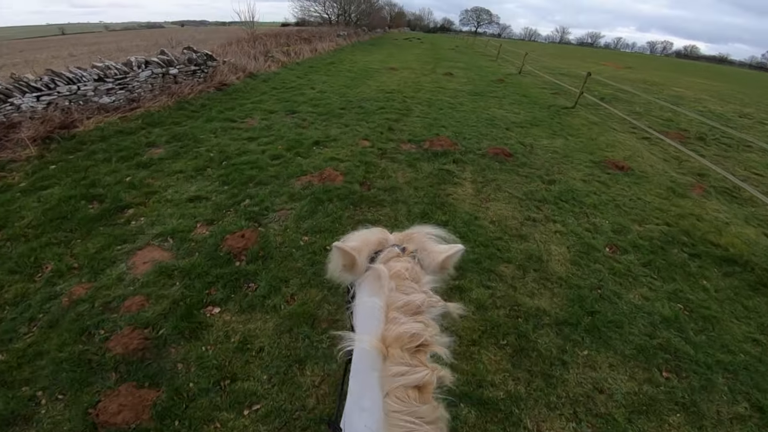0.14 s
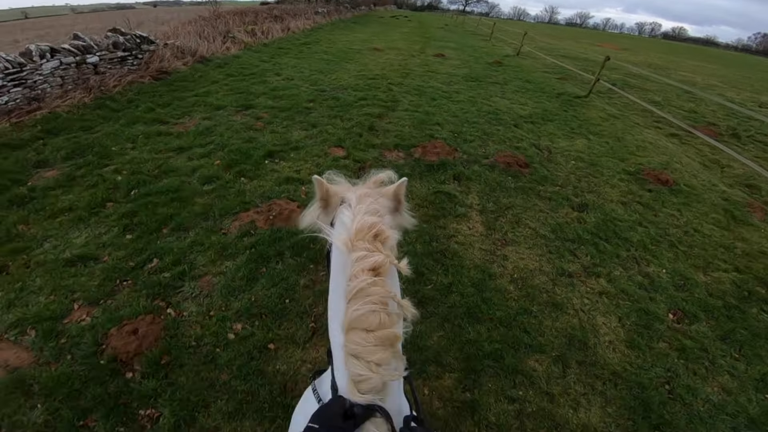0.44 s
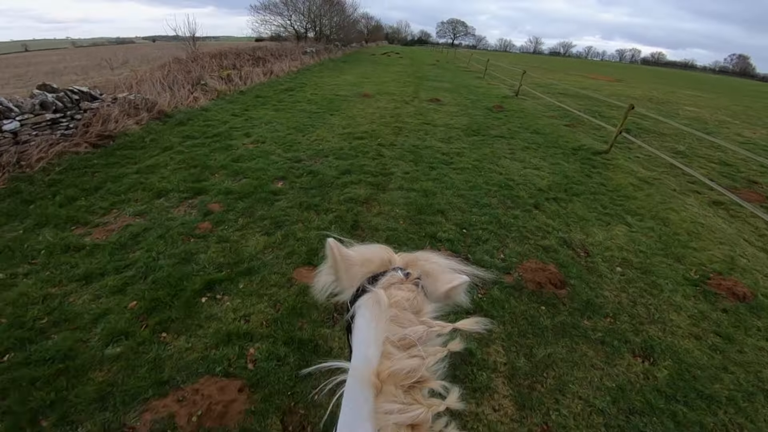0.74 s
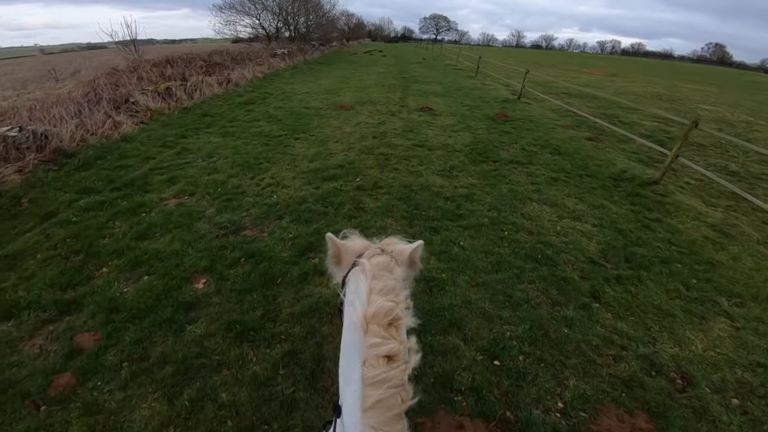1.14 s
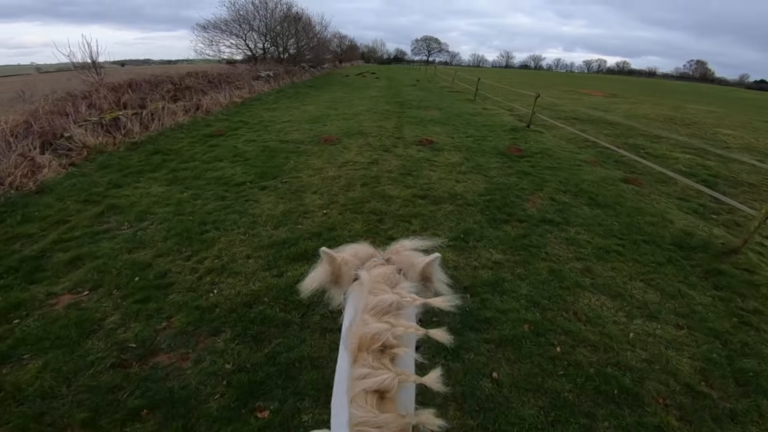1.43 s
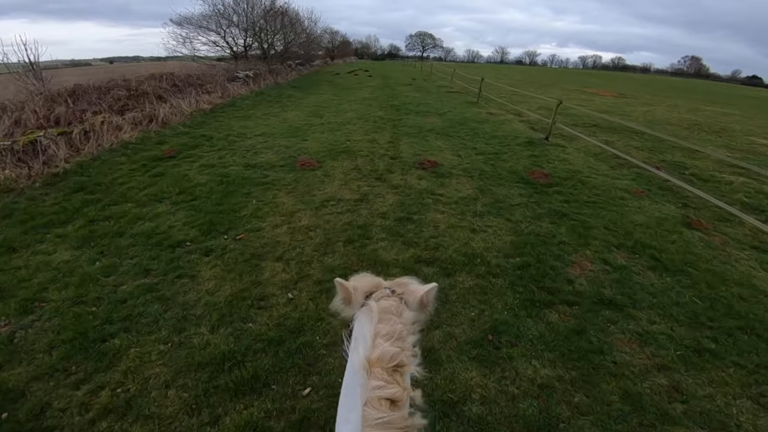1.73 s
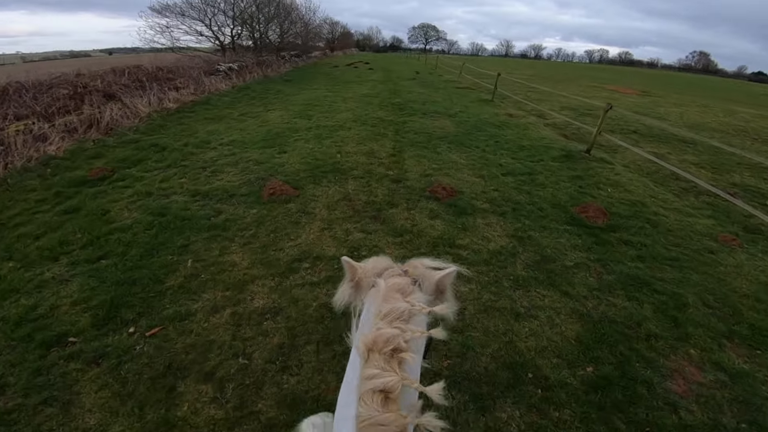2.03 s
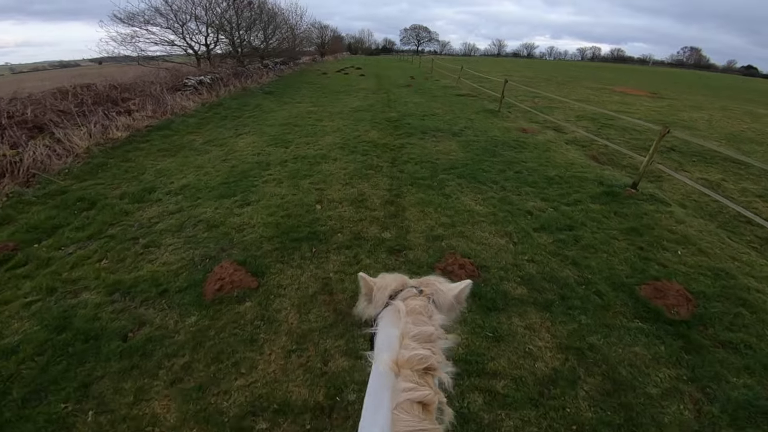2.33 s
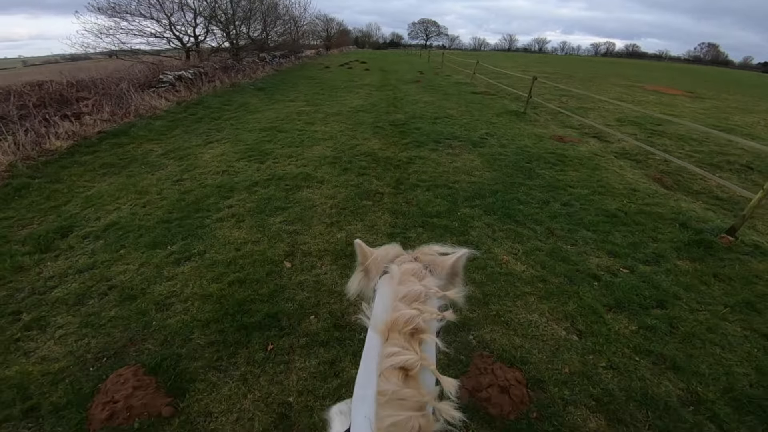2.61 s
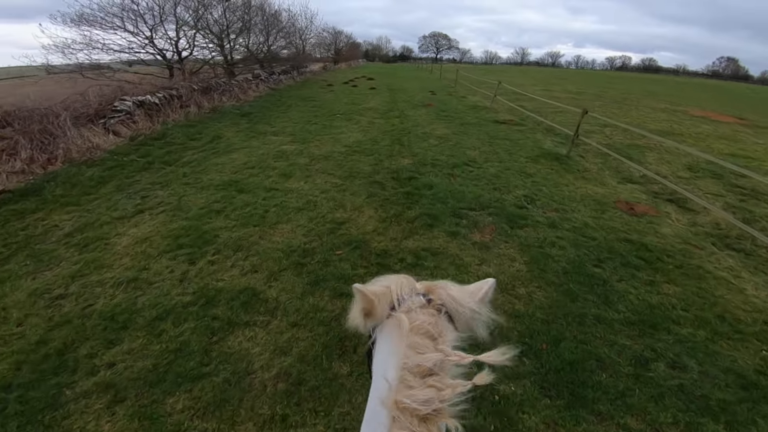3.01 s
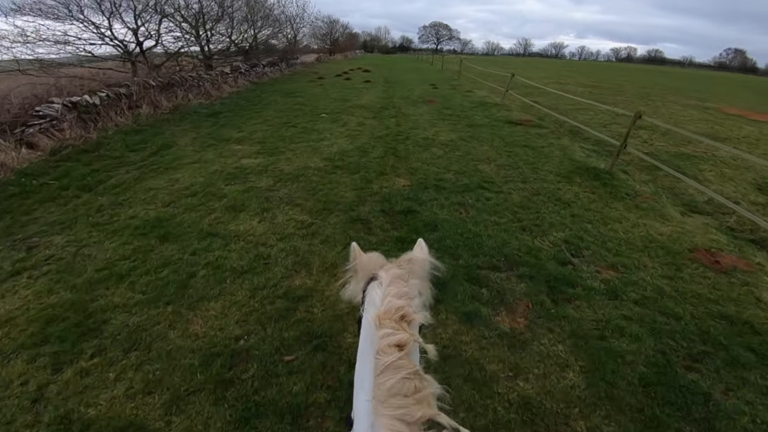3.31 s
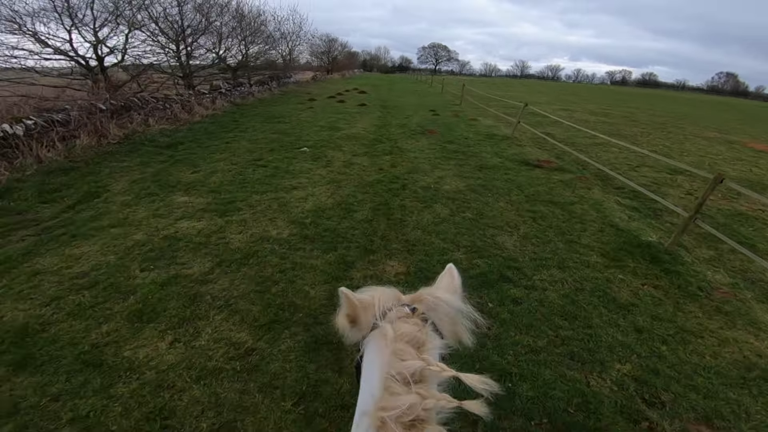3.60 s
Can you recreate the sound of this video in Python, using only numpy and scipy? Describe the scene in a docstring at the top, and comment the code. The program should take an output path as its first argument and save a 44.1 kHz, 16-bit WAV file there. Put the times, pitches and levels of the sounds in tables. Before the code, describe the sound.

Cantering hooves thud dully through wet turf while gusty wind buffets and pops the rider's microphone.

```python
"""Open wet grass, with a pony cantering over it, heard from a camera on the rider's head.
Wind on the microphone is a deep noise rumble under surging gusts, their bright edge gritty with eddies;
short flaps of turbulence and sharp, pulse-like pops break out of it.
Below, each hoof swishes through the grass as patchy noise and lands with a soft thud of decaying sines.
A faint, steady hiss of air and grass lies behind it all."""
import sys
import numpy as np
from scipy import signal
from scipy.fft import rfft, irfft
from scipy.io import wavfile
from scipy.ndimage import uniform_filter1d, map_coordinates

SR = 44100
rng = np.random.default_rng(int(sys.argv[2]) if len(sys.argv) > 2 else 0)


def transcribe(signal):
    """Save signal, clipped to [-1, 1], as a 16-bit WAV file at the path in sys.argv[1]."""
    frames = np.atleast_2d(signal).T
    limited = np.clip(frames, -1, 1)
    pcm = np.round(limited * 32767).astype(np.int16)
    wavfile.write(sys.argv[1], SR, pcm)


def undo_db(level):
    """Turn decibels back into plain size, where 20 dB means ten times bigger."""
    steps = np.asarray(level, float) / 20
    return 10 ** steps


N = 165375  # length in samples

# In every colour below, level/dB is relative: the layer sets its own loudness afterwards.
# Colour of the steady rush of air and grass: f/Hz, level/dB
HISS_COLOUR = [(1290, -45.5), (2200, -20), (3140, -13.5), (3990, -4), (4530, -6), (6510, -14),
               (6900, -27.5), (7160, -38), (7840, -44), (10200, -81.5), (17200, -120)]
# Course of the wind: t/s, gust level/dB before trim, bright edge level/dB over the gust before trim,
# rumble level/dB before tilt, rumble tilt/dB (positive favours its upper part)
WIND_COURSE = [(0.0, -52.5, -4, -39, 11.5), (0.05, -39, -22, -27.5, -3), (0.11, -38, -10, -28.5, 0),
               (0.19, -32.5, -17.5, -29.5, 0.5), (0.27, -41, -18.5, -29, 4), (0.34, -36.5, -18.5, -27.5, 2),
               (0.38, -48, -5, -36.5, 1), (0.408, -42.5, -30, -25, 0.5), (0.43, -62.5, 2, -39.5, 0),
               (0.47, -50.5, -12, -29, 1), (0.551, -46.5, -16, -28, -0.5), (0.581, -32, -19.5, -33.5, 0),
               (0.59, -52, -10, -28.5, 2), (0.62, -52, -12, -30.5, 3.5), (0.655, -45.5, -12, -22, -2),
               (0.675, -41.5, -16, -31.5, 7.5), (0.69, -39.5, -8, -22, -7.5),
               (0.712, -34.5, -9.5, -27, -3.5), (0.73, -34.5, -23, -30, -1),
               (0.761, -28, -25.5, -25.5, -3.5), (0.802, -33, -12, -24, 0), (0.821, -40.5, -20, -32, 4),
               (0.869, -46.5, -21, -33, -2), (0.88, -42.5, -16, -33.5, 1), (0.94, -40.5, -17, -29, -2.5),
               (1.049, -49.5, -18, -30, -1.5), (1.17, -32.5, -26.5, -28, 3),
               (1.19, -33.5, -15, -30.5, -1.5), (1.203, -30, -23, -25, -4),
               (1.211, -32.5, -12.5, -24.5, 0.5), (1.232, -31, -9.5, -28.5, -1),
               (1.25, -31, -17.5, -28.5, -6.5), (1.35, -40, -8.5, -28.5, -1), (1.42, -45.5, -10, -30.5, -2),
               (1.501, -42, -23, -35, 0.5), (1.509, -29.5, -35, -26.5, -6), (1.53, -32, -19.5, -34, 0),
               (1.56, -35.5, -44, -33, 9), (1.58, -38.5, -23.5, -31.5, 0.5), (1.689, -30, -18.5, -33, 5),
               (1.738, -30, -17.5, -28.5, -5), (1.784, -26.5, -19.5, -31, -4),
               (1.819, -38.5, -12, -36.5, 13.5), (1.89, -36, -14, -33, -1), (1.99, -39.5, -13, -31.5, 1.5),
               (2.09, -45.5, -18.5, -34, 0), (2.12, -43.5, -39, -37, 11.5), (2.251, -31, -22, -30.5, 5.5),
               (2.273, -29.5, -18, -30, 4.5), (2.285, -26.5, -20, -35, 0), (2.299, -30.5, -14.5, -30.5, 3),
               (2.37, -30.5, -19.5, -30.5, 4.5), (2.42, -40, -8, -35, -3.5), (2.58, -36, -21.5, -30.5, 2),
               (2.622, -46, -20, -37.5, -2.5), (2.651, -30, -19.5, -24.5, -1.5), (2.69, -39, -28, -33, 5),
               (2.75, -36.5, -26, -28.5, 3), (2.901, -36, -20.5, -29, 3), (2.94, -29, -18, -30, 4),
               (3.04, -33, -15.5, -25.5, -2), (3.056, -45, -11, -36, 8), (3.08, -39, -8.5, -31.5, 0),
               (3.14, -41.5, -24, -33, -4.5), (3.24, -41.5, -35, -29.5, 3.5), (3.33, -36, -42, -26, -4.5),
               (3.361, -32.5, -17, -27, 10), (3.42, -32, -15, -26.5, 3), (3.48, -32.5, -12, -28.5, 0),
               (3.509, -32.5, -11, -15, -3.5), (3.53, -36.5, -14, -20.5, -5),
               (3.59, -38.5, -6.5, -25.5, -2), (3.62, -43, -11, -27, -1.5), (3.74, -35, -25, -32, 1),
               (3.75, -33, -16, -30.5, -6)]
# Colour of the low wind rumble before tilt: f/Hz, level/dB
RUMBLE_COLOUR = [(11, -42), (18, -2), (48, -4), (85, 3), (145, -1.5), (233, -7.5), (417, -19.5),
                 (454, -25.5), (500, -32), (650, -60.5), (1100, -120)]
# Colour of the body of the gusts: f/Hz, level/dB
GUST_COLOUR = [(82, -30), (140, -1), (236, -3.5), (333, -3.5), (529, -9), (571, -8), (1400, -27.5),
               (1820, -51), (3080, -120)]
# Colour of the bright edge of the gusts: f/Hz, level/dB
EDGE_COLOUR = [(500, -5), (900, -1), (1200, -6.5), (1700, -6.5), (2300, -17.5), (3100, -27), (4200, -25.5),
               (5300, -38), (6500, -47), (7600, -71.5)]
# Short flaps of air on the microphone port: t/s, level/dB before trim and envelope
FLAP_EVENTS = [(0.303, -21), (0.326, -30), (0.578, -44), (0.627, -27.5), (0.651, -26.5), (0.695, -29),
               (0.889, -29.5), (0.944, -26), (1.133, -28), (1.157, -18), (1.215, -30), (1.229, -18.5),
               (1.262, -16), (1.322, -18.5), (1.404, -34), (1.484, -23.5), (1.512, -34), (1.593, -25),
               (1.753, -11), (1.903, -23), (2.003, -24.5), (2.271, -23), (2.466, -33), (2.52, -19),
               (2.626, -23.5), (2.645, -32), (2.727, -34), (2.787, -47), (2.852, -42), (2.907, -28),
               (3.223, -24.5), (3.315, -24.5), (3.356, -30), (3.388, -22), (3.449, -29), (3.533, -20.5),
               (3.591, -18), (3.638, -20)]
# Colour of a flap: f/Hz, level/dB
FLAP_COLOUR = [(200, -22), (400, 2.5), (900, -2.5), (1700, -18), (2600, -32.5), (4200, -47), (6500, -58),
               (7600, -90)]
# Strongest jolts of the wind: t/s, peak level/dB before trim
POP_EVENTS = [(0.0947, -43), (0.182, -45), (0.21, -35.5), (0.7015, -36), (0.711, -38), (0.7725, -35.5),
              (0.794, -46), (0.8005, -43), (1.208, -24.5), (1.2935, -29), (1.3294, -41), (1.724, -33),
              (1.739, -43), (1.758, -35), (1.7815, -32), (1.818, -43), (2.2751, -35.5), (2.2908, -41),
              (2.325, -56), (2.943, -36), (2.961, -35.5), (2.971, -44), (2.978, -35), (3.017, -42),
              (3.031, -32), (3.037, -33), (3.048, -44), (3.3905, -36), (3.426, -40), (3.4535, -42),
              (3.486, -35.5), (3.491, -33), (3.5085, -30), (3.512, -26.5), (3.5321, -32), (3.5593, -33)]
# Colour of a pop: f/Hz, level/dB
POP_COLOUR = [(200, -19), (600, 11.5), (1800, 1), (3000, -14), (4500, -18.5), (5500, -33.5), (6500, -57.5),
              (8000, -100)]
# Hooves in the grass: t/s, swish level/dB before trim and envelope, swish fade time/s,
# thud level/dB over the untrimmed swish
HOOF_EVENTS = [(0.0224, -47, 0.02, 25), (0.273, -48.5, 0.039, 7.5), (0.362, -43.5, 0.026, 8),
               (0.4414, -38, 0.0083, 14), (0.474, -49, 0.041, 22), (0.544, -52.5, 0.029, 24),
               (0.835, -53, 0.065, 8), (0.93, -47, 0.036, 30.5), (1.0166, -40.5, 0.013, 19.5),
               (1.061, -45.5, 0.031, 11), (1.123, -49, 0.029, 23), (1.409, -55, 0.059, 17),
               (1.465, -56.5, 0.081, 8), (1.577, -46, 0.022, 7), (1.98, -54.5, 0.041, 31),
               (2.088, -47.5, 0.013, 26), (2.149, -49.5, 0.038, 6), (2.4, -44, 0.012, 19),
               (2.5416, -52.5, 0.037, 15), (2.6425, -42.5, 0.015, 16), (2.7033, -50, 0.033, 30.5),
               (3.093, -53, 0.058, 28), (3.139, -57.5, 0.092, 16), (3.215, -46, 0.013, 19),
               (3.282, -45, 0.023, 25.5), (3.653, -52.5, 0.064, 9)]
# Colour of the wet blades: f/Hz, level/dB
GRASS_COLOUR = [(900, -50), (1500, 7.5), (2200, 3.5), (3100, -8), (4200, 2), (5500, -2.5), (6600, -9),
                (7600, -23.5), (8500, -77)]
# Modes of the soft turf, before each hoof's scatter: f/Hz, level/dB, time to fall by 60 dB/s
TURF_MODES = [(107, 5.5, 0.035), (249, 1.5, 0.022), (480, -15.5, 0.09)]


def unit(x):
    """x at rms 1."""
    return x / np.sqrt(np.mean(x ** 2) + 1e-20)


def gains(points, size):
    """Gain of (f/Hz, level/dB) points on an FFT grid, joined by lines over log frequency."""
    hz, db = np.transpose(points)
    grid_hz = np.fft.rfftfreq(size, 1 / SR)
    return undo_db(np.interp(np.log(grid_hz + 1), np.log(hz + 1), db, left=-100, right=-120))


def coloured(x, points):
    """x through a causal minimum-phase filter with the given spectrum."""
    size = 8192
    # folding the cepstrum forward in time makes the phase minimal
    cepstrum = irfft(np.log(gains(points, size)))
    cepstrum[1:size // 2] *= 2
    cepstrum[size // 2 + 1:] = 0
    response = irfft(np.exp(rfft(cepstrum)))
    return signal.fftconvolve(x, response)[:N]


def wobble(rate):
    """A smooth random curve with rate knots a second."""
    knots = rng.standard_normal(int(N * rate / SR) + 4)
    return map_coordinates(knots, [np.arange(N) * rate / SR])


def grains(per_s, spread_db):
    """Random impulses of either sign, mostly small, a few large; rms 1."""
    present = rng.random(N) < per_s / SR
    size = np.minimum(rng.exponential(size=N), 3)
    sign = rng.choice([-1, 1], N)
    return unit(present * sign * undo_db(spread_db * size))


def puffs(x, life_s):
    """Each impulse of x becomes a short, decaying burst of noise; rms 1."""
    decay = np.exp(-np.arange(SR // 50) / SR / life_s)
    power = signal.fftconvolve(x ** 2, decay)[:N]
    return unit(np.sqrt(np.abs(power)) * rng.standard_normal(N))


def patchy(x):
    """Random patches of gain over time and pitch, as in uneven air or grass; rms 1."""
    depth_db = 1.6
    z = signal.stft(x, nperseg=256)[2]
    field = rng.standard_normal(z.shape)
    field = uniform_filter1d(field, size=5, axis=0)  # across pitch
    field = uniform_filter1d(field, size=7, axis=1)  # across time
    return unit(signal.istft(z * undo_db(depth_db * unit(field)), nperseg=256)[1][:N])


def impulses(rows, points):
    """One short pulse of the given colour and peak level, of either sign, for each (t/s, level/dB) row."""
    s, db = np.transpose(rows)
    sign = rng.choice([-1, 1], len(s))
    clicks = np.bincount(np.round(s * SR).astype(int), undo_db(db) * sign, N)
    single_click = np.eye(1, N)[0]
    return coloured(clicks, points) / np.abs(coloured(single_click, points)).max()


def hiss():
    """A steady noise rush of air and grass that wavers a little."""
    level_db = -73.5 + 1.8 * wobble(8.4)
    return undo_db(level_db) * unit(coloured(rng.standard_normal(N), HISS_COLOUR))


def wind_curves():
    """Gust, edge, rumble and tilt in dB, gliding between the points of the wind's course."""
    s, *columns = np.transpose(WIND_COURSE)
    return [np.interp(np.arange(N) / SR, s, column) for column in columns]


def rumble(rumble_db, tilt_db):
    """Low, uneven wind noise that leans to either side of a pivot pitch."""
    lumps_db, pivot_hz = 2.5, 95
    lumpy = rng.standard_normal(N) * undo_db(lumps_db * wobble(12))
    whole = unit(coloured(lumpy, RUMBLE_COLOUR))
    lowpass = signal.butter(2, pivot_hz, fs=SR, output="sos")
    deep = signal.sosfiltfilt(lowpass, whole)
    tilted = undo_db(-tilt_db) * deep + undo_db(tilt_db) * (whole - deep)
    return undo_db(rumble_db) * tilted


def gusts(gust_db, edge_db):
    """Lumpy noise and small pressure jolts; the body and the bright edge share the same stir."""
    eddies_per_s, eddy_life_s, eddy_share = 450, 0.0008, 0.45  # share of the power
    spread_db, crackle_per_s, lumps_db = 3, 400, 1.3
    body_trim_db, edge_trim_db = 2, 2
    eddies = puffs(grains(eddies_per_s, spread_db), eddy_life_s)
    stir = np.sqrt(1 - eddy_share) * rng.standard_normal(N) + np.sqrt(eddy_share) * eddies
    stir = patchy(stir * undo_db(lumps_db * wobble(45)))
    crisp = stir + grains(crackle_per_s, spread_db)  # dry ticks, as strong as the stir
    body = undo_db(body_trim_db) * unit(coloured(stir, GUST_COLOUR))
    edge = undo_db(edge_db + edge_trim_db) * unit(coloured(crisp, EDGE_COLOUR))
    return undo_db(gust_db) * (body + edge)


def flaps():
    """Quick bursts of turbulence on the microphone port, each a rise and a fall."""
    trim_db, rise_s, fall_s = -4.5, 0.0029, 0.0065
    s, db = np.transpose(FLAP_EVENTS)
    t = np.arange(SR // 10) / SR
    starts = np.bincount(np.round(s * SR).astype(int), undo_db(db + trim_db), N)
    envelope = (1 - np.exp(-t / rise_s)) * np.exp(-t / fall_s)
    swell = signal.fftconvolve(starts, envelope)[:N]
    return swell * unit(coloured(rng.standard_normal(N), FLAP_COLOUR))


def pops():
    """The wind's strongest jolts, each a single short pressure pulse."""
    return undo_db(5) * impulses(POP_EVENTS, POP_COLOUR)


def wind():
    """Air on the microphone: rumble and gusts, broken by flaps and pops."""
    gust_db, edge_db, rumble_db, tilt_db = wind_curves()
    return rumble(rumble_db, tilt_db) + gusts(gust_db, edge_db) + pops() + flaps()


def swish_envelope(t, fade_s):
    """The brush of one hoof: a soft onset, then a fade as the blades let go."""
    rise_s, fade_steepness = 0.012, 1.04
    return (1 - np.exp(-t / rise_s)) * np.exp(-(t / fade_s) ** fade_steepness)


def thud(t, scatter):
    """Soft turf as a few decaying sines, each hoof scattering their level and pitch."""
    rise_s = 0.0026
    ring = np.zeros(len(t))
    for (hz, db, t60), r in zip(TURF_MODES, scatter):
        decay = undo_db(db + 2 * r - 60 * t / t60)
        ring += decay * np.sin(2 * np.pi * hz * (1 + 0.14 * r) * t)
    return ring * (1 - np.exp(-t / rise_s))


def hooves():
    """Each hoof brushes many wet blades, heard as grainy noise, and the turf gives a dull thud."""
    swish_trim_db, blades_per_s, blade_spread_db = -3, 3400, 5
    t = np.arange(SR // 4) / SR
    brush, turf = np.zeros(N + SR), np.zeros(N + SR)  # room for the last tail
    scatters = rng.standard_normal((len(HOOF_EVENTS), len(TURF_MODES)))
    for (s, db, fade_s, thud_db), scatter in zip(HOOF_EVENTS, scatters):
        span = slice(round(s * SR), round(s * SR) + len(t))
        brush[span] += undo_db(db + swish_trim_db) * swish_envelope(t, fade_s)
        turf[span] += undo_db(db + thud_db) * thud(t, scatter)
    rustle = rng.standard_normal(N) + 1.1 * grains(blades_per_s, blade_spread_db)
    blades = patchy(coloured(rustle, GRASS_COLOUR))
    return brush[:N] * blades + turf[:N]


def scene():
    """Hiss, wind and hooves at one microphone."""
    return (hiss() + wind() + hooves())[None]


def top_cut(x):
    """Nothing passes above the cut-off."""
    return signal.sosfilt(signal.butter(12, 7990, fs=SR, output="sos"), x)


def record(dry):
    """The heaviest swings are softly squashed towards a ceiling."""
    ceiling = undo_db(-9)
    squashed = dry / (1 + np.abs(dry / ceiling) ** 3) ** (1 / 3)
    return top_cut(squashed)


dry = scene()
out = record(dry)
transcribe(out)
```